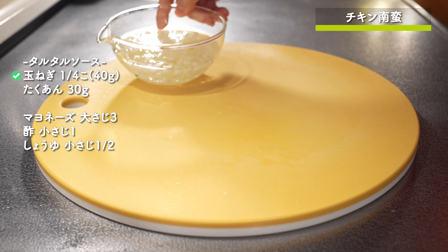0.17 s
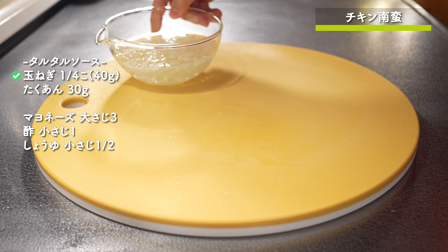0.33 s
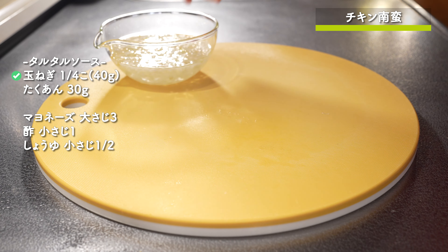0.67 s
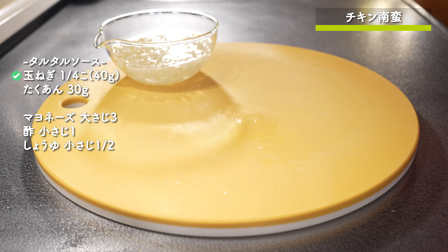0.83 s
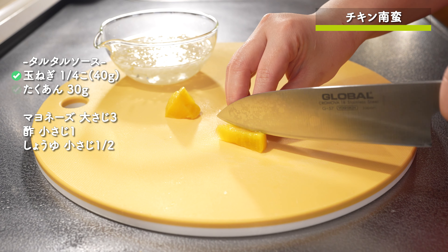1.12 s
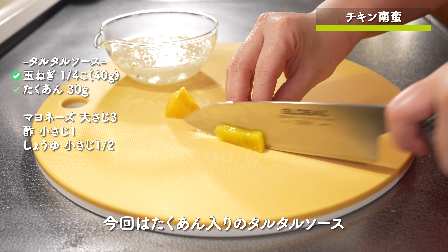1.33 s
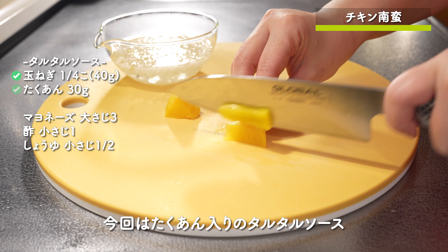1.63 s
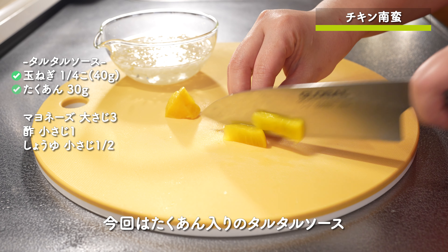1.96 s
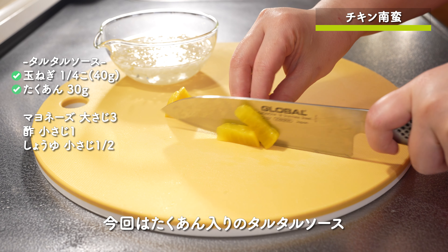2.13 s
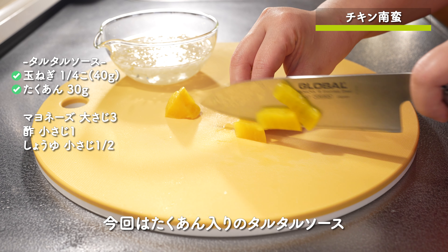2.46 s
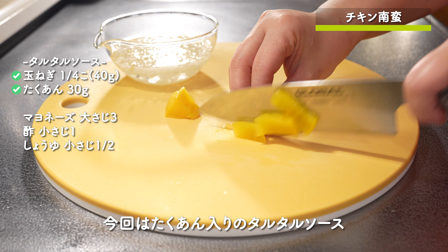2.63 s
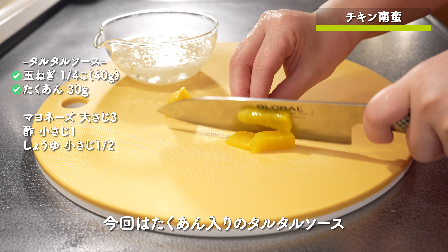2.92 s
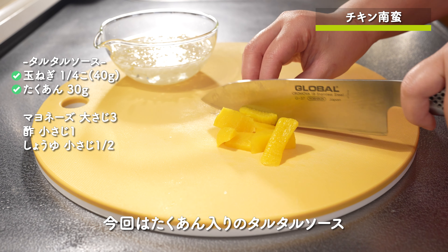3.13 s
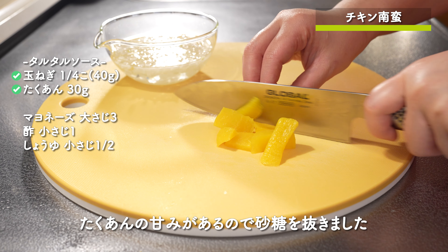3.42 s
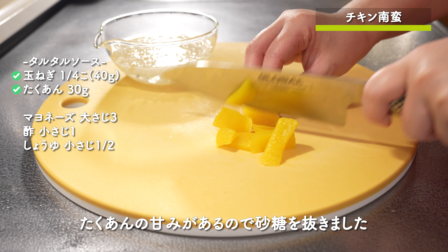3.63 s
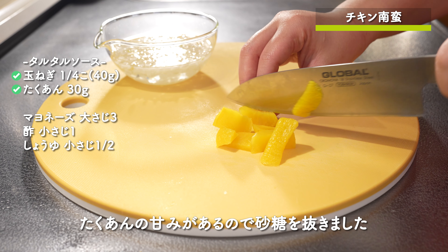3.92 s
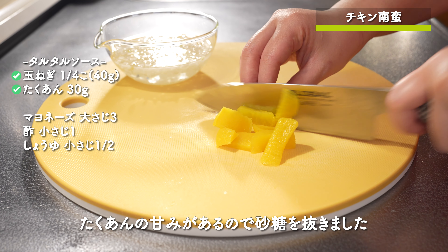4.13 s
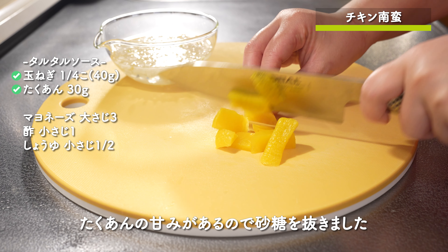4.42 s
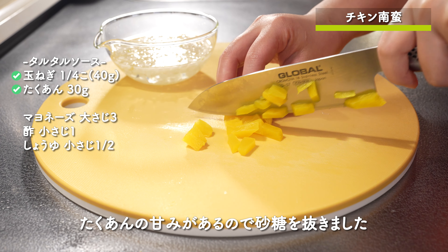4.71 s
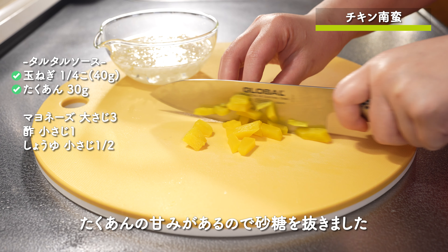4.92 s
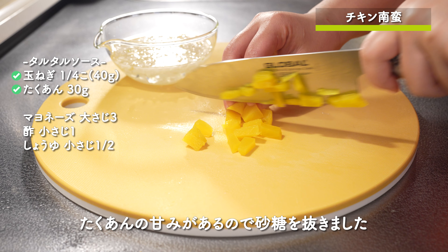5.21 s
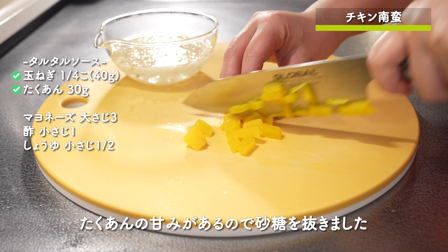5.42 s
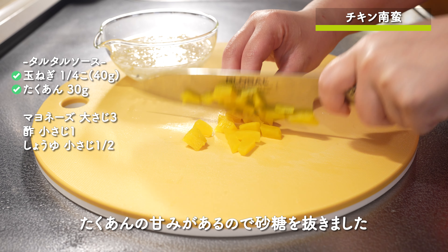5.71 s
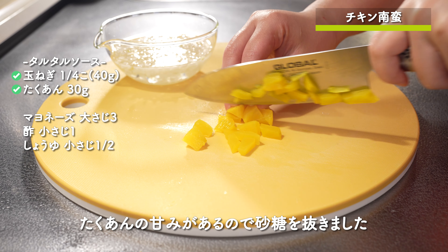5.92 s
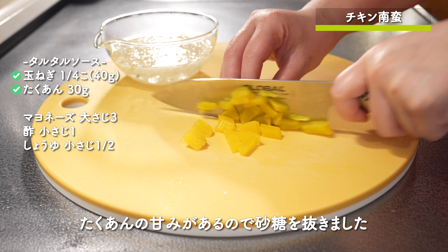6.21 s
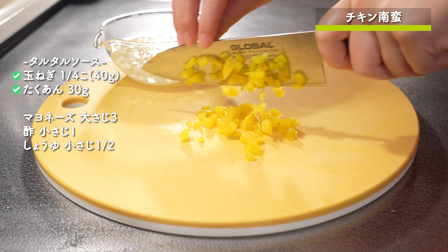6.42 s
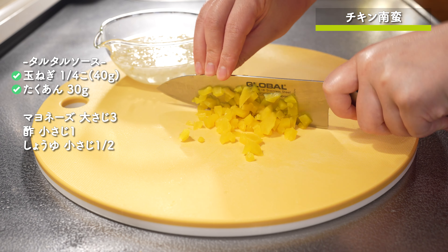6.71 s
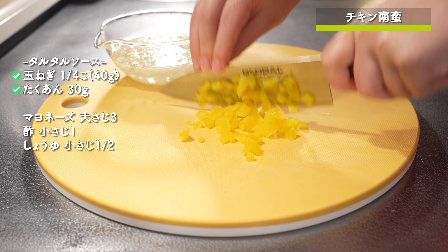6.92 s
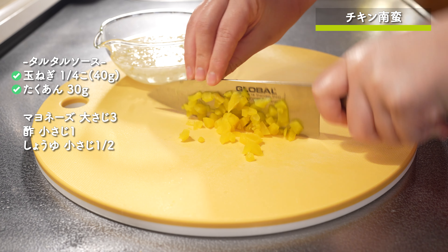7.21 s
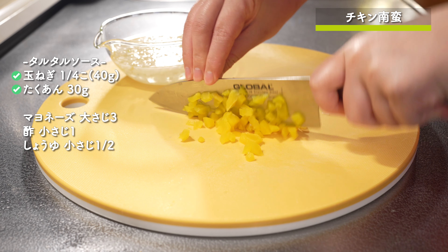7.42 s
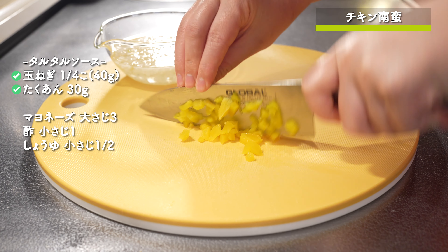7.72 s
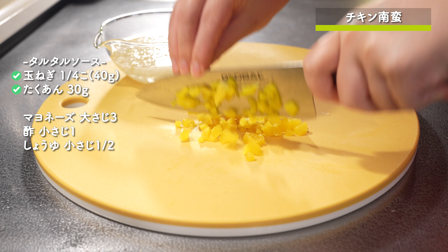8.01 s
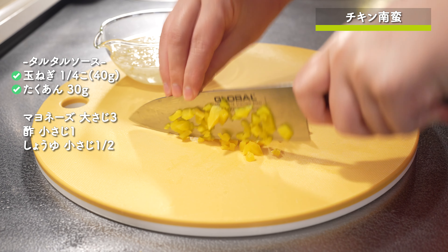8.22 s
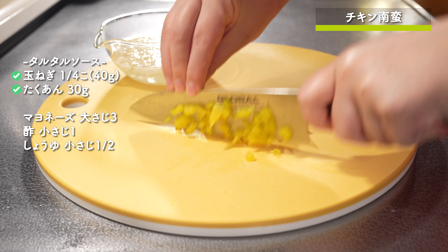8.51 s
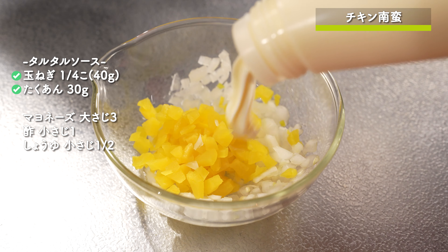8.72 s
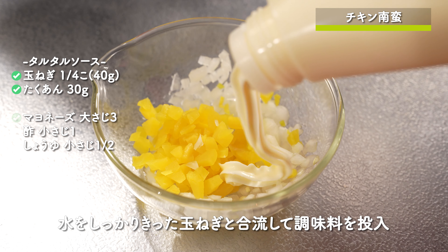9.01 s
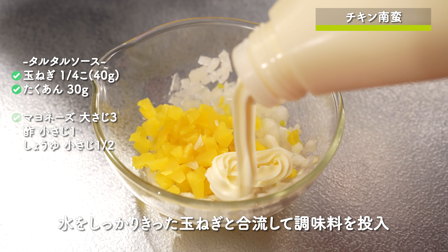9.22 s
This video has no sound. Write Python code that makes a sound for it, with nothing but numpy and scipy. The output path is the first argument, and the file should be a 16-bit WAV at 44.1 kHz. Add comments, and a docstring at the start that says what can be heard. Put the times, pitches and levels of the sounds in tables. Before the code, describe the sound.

A glass bowl is set down and slides wetly, then a steel knife crunches through pickled radish on a plastic board in a quiet kitchen.

```python
"""In a quiet humming kitchen a glass bowl is set down and wet glass slides over the counter, hissing as smooth noise.
Then a steel knife slices and chops crisp pickles on a plastic board lying on a steel counter, near one microphone.
Bursting noise makes the crunch; short pushes ring the modes of board and counter; resonances make the blade sing.
After the last cut come a few small clicks and a dry tap. Behind it filtered noise hums, a whine comes and goes,
and fuzzy bands swell after some knocks, like their tails."""
import sys
import numpy as np
from scipy import signal
from scipy.fft import rfft, irfft, next_fast_len
from scipy.io import wavfile
from scipy.ndimage import uniform_filter1d, map_coordinates

SR = 44100
rng = np.random.default_rng(int(sys.argv[2]) if len(sys.argv) > 2 else 0)


def generate_wav(signal):
    """Clip the signal to [-1, 1] and save it as 16-bit WAV at the path in sys.argv[1]."""
    frames = np.transpose(np.atleast_2d(signal))
    scaled = np.clip(frames, -1, 1) * 32767
    pcm = np.round(scaled).astype(np.int16)
    wavfile.write(sys.argv[1], SR, pcm)


N = 412776

# Knocks: (time [s], peak level ahead of the crack [dB], time for the push to peak [ms],
#          thud [dB], boom [dB], extra for boom modes below 140 Hz [dB])
BLOWS = [(0.1815, -13, 0.35, 4.5, 4.5, -6.5), (0.5015, -23.5, 0.78, -3, 2, -1.5),
         (1.3064, -15.5, 0.51, -16, 4, -12), (1.4209, -28.5, 1.34, 0, 4.5, 5.5),
         (1.9909, -10.5, 0.25, -10, 1, 3), (2.655, -11, 0.18, -8.5, 4.5, -3), (3.154, -44, 0.59, 5, -12, 0),
         (3.171, -49, 0.51, -8, 19, -12), (3.2568, -29.5, 1.3, -4, 15, -10),
         (3.4128, -27, 1.44, 6.5, 12, 0), (4.0215, -35, 0.5, 12, 9, -3), (4.0949, -15, 0.59, -26, 2.5, -20),
         (4.1737, -30, 2.5, 10.5, -5, 14), (4.7892, -36, 0.83, 7.5, -4, 14), (4.862, -28, 0.9, 4, -7, 0),
         (4.8678, -23, 0.81, -1, 5.5, 4.5), (5.441, -20.5, 0.72, 9.5, -5, -1),
         (5.463, -11.5, 0.2, -1.5, -6, -3), (5.5523, -24.5, 0.9, 4, 2, 9.5),
         (5.621, -33.5, 1.2, 16.5, 19, -3.5), (6.151, -21.5, 0.2, -6, -12, 3.5),
         (6.1685, -11.5, 0.17, -5, 5, -7), (6.2603, -36.5, 1.4, 10.5, 4, 13.5),
         (6.591, -35, 0.69, 27, -7, 5.5), (6.615, -33, 0.13, -5, 6, -11),
         (6.6419, -28.5, 1.44, -16, 2.5, -10), (7.1346, -14.5, 0.18, 0, 1, -2.5),
         (7.227, -21, 3.2, 21, 3.5, 10.5), (7.6575, -11.5, 0.11, -3, 3.5, -2),
         (7.7657, -22.5, 1.2, 9, 3, 6), (8.2041, -11.5, 0.16, -12.5, 4, -3),
         (8.3032, -17.5, 1.34, 9, 1.5, 6)]
# Tones of the steel blade: (frequency [Hz], width [Hz], level [dB])
BLADE_TONES = [(2600, 70, -3), (3030, 100, -3), (3590, 130, -3), (3950, 90, -2), (5280, 80, -3),
               (6100, 150, -3), (7050, 170, -2), (8350, 130, -2), (9900, 150, -8), (11530, 90, -1),
               (13500, 200, -6)]
# Spectrum of the flesh crunching: (frequency [Hz], level per Hz [dB])
CRUNCH_SPECTRUM = [(1060, -37), (1800, -10.5), (2050, 2), (2270, -4.5), (2720, -0.5), (3600, 6.5),
                   (5400, -6.5), (7500, -15), (9750, -46), (16500, -120)]
# Spectrum of the fine fizz on top: (frequency [Hz], level per Hz [dB])
FIZZ_SPECTRUM = [(3240, -48.5), (5500, 0), (7550, 2.5), (8220, 5.5), (15100, 2.5), (16200, -8.5)]
# Spectrum of friction heard through the board: (frequency [Hz], level per Hz [dB])
BODY_SPECTRUM = [(88, -35), (150, 15), (389, 4.5), (522, 5), (919, 6), (1520, 5), (2250, -9.5), (2500, -7),
                 (3250, -27), (5500, -120)]


def amp(db):
    """dB to gain."""
    return 10 ** (np.asarray(db) / 20)


def unit(x):
    """Scaled to rms 1."""
    return x / np.sqrt(np.mean(x ** 2) + 1e-20)


def along(points, hz):
    """(Hz, value) points on a log axis."""
    f, v = np.transpose(points)
    return np.interp(np.log(hz + 1), np.log(f + 1), v)


def filtered(x, response):
    """x times a complex response of frequency."""
    m = next_fast_len(len(x) + 8192)
    return irfft(rfft(x, m) * response(np.fft.rfftfreq(m, 1 / SR)), m)[:len(x)]


def coloured(x, spectrum):
    """x with the given spectrum, rms 1."""
    return unit(filtered(x, lambda hz: amp(along(spectrum, hz))))


def resonant(peaks, sign=-1):
    """Causal response of a set of resonances; neighbours in opposite phase unless sign is 1."""
    return lambda f: sum(sign ** k * amp(db) * 1j * f * w / (c * c - f * f + 1j * f * w)
                         for k, (c, w, db) in enumerate(peaks))


def wobble(rate):
    """A smooth random curve through normally distributed knots, rate of them a second."""
    knots = rng.standard_normal(int(N * rate / SR) + 4)
    return map_coordinates(knots, [np.arange(N) * rate / SR])


def gain_curve(rows):
    """Gain per sample of a (time [s], level [dB]) curve."""
    return amp(np.interp(np.arange(N) / SR, *np.transpose(rows)))


def ramps(rows, rise, fall):
    """Gains per sample: a row rises, ramps between two levels and falls [dB/s]; later columns add gains."""
    out = np.zeros((len(rows[0]) - 3, N))
    t = np.arange(N) / SR
    for start, end, first, last, *rest in rows:
        near = slice(max(0, round((start - .2) * SR)), round((end + .3) * SR))
        now = t[near]
        db = np.interp(now, [start, end], [first, last])
        db = db - rise * np.maximum(start - now, 0) - fall * np.maximum(now - end, 0)
        gains = amp(db + np.array([0, *rest])[:, None])
        out[:, near] = np.hypot(out[:, near], gains)  # overlapping rows add as power
    return out


def background_hum():
    """Broad noise, strongest in the bass, whose level wavers a little."""
    # Hum of the quiet kitchen: (frequency [Hz], level per Hz [dB])
    hum_spectrum = [(15, -13.5), (40, 0), (60, 4.5), (130, -0.5), (230, -4.5), (350, -9.5), (600, -17),
                    (1000, -16), (1500, -21.5), (2400, -24.5), (3700, -19), (5200, -28.5), (8000, -33.5),
                    (13000, -35), (16200, -36.5)]
    level_db = -67 + 2.36 * wobble(2.962)
    return amp(level_db) * coloured(rng.standard_normal(N), hum_spectrum)


def background_drone():
    """Noise through three resonances: fuzzy bands whose level swells after some knocks, like their tails."""
    # Bands of the drone: (frequency [Hz], width [Hz], level [dB])
    drone_bands = [(431, 41, 4), (718, 368, 2.5), (838, 250, -1.5)]
    # Level of the drone and of tails after knocks: (time [s], level [dB])
    drone_levels = [(0.0, -79), (0.44, -65), (1.07, -72.5), (1.9, -70), (3.93, -73), (4.12, -65.5),
                    (6.07, -78.5), (6.23, -59), (6.33, -69.5), (7.69, -85.5), (7.77, -70.5), (9.36, -79.5)]
    drone = unit(filtered(rng.standard_normal(N), resonant(drone_bands)))
    return gain_curve(drone_levels) * drone


def background_hiss():
    """Very faint noise with the fizz spectrum and a slowly wavering level."""
    level_db = -99.5 + 1.5 * wobble(1.5)
    return amp(level_db) * coloured(rng.standard_normal(N), FIZZ_SPECTRUM)


def background_whine():
    """Noise passed twice through one resonance makes a fuzzy whine that comes and goes, trembling."""
    # Band of the whine, for each pass: (frequency [Hz], width [Hz], level [dB])
    whine_band = [(1472, 140, 0)]
    # Level of the whine before its tremble: (time [s], level [dB])
    whine_levels = [(0.0, -93), (0.21, -90), (0.34, -85), (1.69, -83), (2.01, -69.5), (3.2, -82.5),
                    (3.39, -69.5), (3.83, -76), (4.28, -61), (4.46, -70), (5.42, -77), (5.81, -93),
                    (6.31, -76.5), (7.27, -75.5), (7.43, -93.5), (8.37, -78.5), (8.73, -84.5), (9.36, -85)]
    whine = unit(filtered(rng.standard_normal(N), lambda hz: resonant(whine_band)(hz) ** 2))
    return gain_curve(whine_levels) * amp(2.2 * wobble(14)) * whine


def room(x):
    """The kitchen answers 2.9 ms later with a noise tail in which each frequency dies at its own speed."""
    # Reverberation of the kitchen: (frequency [Hz], time to fall 60 dB [s])
    kitchen_decay = [(100, 0.64), (400, 0.45), (1000, 0.24), (4000, 0.2), (12000, 0.14)]
    hz, t, noise = signal.stft(rng.standard_normal(SR // 2), SR, nperseg=256)
    fade = amp(-60 * t / along(kitchen_decay, hz)[:, None])
    tail = signal.istft(noise * fade, SR, nperseg=256)[1]
    return signal.fftconvolve(np.pad(x, (130, 0)), tail / np.linalg.norm(tail))


def patchy(x, depth_db):
    """Narrow bands swell and fade at random, as the wet contact shifts."""
    bands = signal.stft(x, nperseg=256)[2]
    field = uniform_filter1d(rng.standard_normal(bands.shape), size=3, axis=0)
    field = uniform_filter1d(field, size=9, axis=1)
    return signal.istft(bands * amp(depth_db * unit(field)), nperseg=256)[1][:N]


def rubbing(pressure, grain):
    """One grain of friction heard as crunch, as fizz and through the board."""
    crunch, fizz, body = pressure
    return (crunch * coloured(grain, CRUNCH_SPECTRUM) + fizz * coloured(grain, FIZZ_SPECTRUM)
            + body * coloured(grain, BODY_SPECTRUM))


def bursting(rate, spread_db):
    """Cells burst at random moments, each a short puff of uneven strength, over a bed of noise."""
    pops = (rng.random(N) < rate / SR) * amp(spread_db * rng.standard_normal(N))
    puff = amp(-60 * np.arange(400) / SR / 0.0094)  # falls at 60 dB in 9.4 ms
    puffs = np.convolve(pops, puff)[:N]
    return rng.standard_normal(N) * (unit(puffs) + 2.14) * amp(1.5 * wobble(90))


def glass_wipes():
    """Wet glass slides over the counter: smooth noise without bursts, with shifting bands."""
    # Slides of the glass: (start [s], end [s], first level [dB], last level [dB],
    #                       added for fizz [dB], added for body [dB])
    wipe_rows = [(0.225, 0.3, -56.5, -60.5, -15, -5), (0.31, 0.42, -60.5, -53.5, -13, -8),
                 (0.43, 0.5, -54, -58, -15.5, -4), (0.64, 0.75, -67, -58, -13.5, -6.5),
                 (0.78, 0.86, -61, -56.5, -16.5, 2), (0.87, 1.0, -54, -68.5, -14.5, -4)]
    glass = patchy(rng.standard_normal(N), depth_db=2.0)
    return rubbing(ramps(wipe_rows, rise=450, fall=310), glass)


def ticks():
    """A small click or touch: a crack of a few ms, with ringing tones, each at a new strength."""
    # Small ticks: (time [s], level, 9 dB above the peak heard [dB],
    #               dullness, held within -6 and 12 [dB per octave])
    tick_rows = [(0.179, -23.5, 23), (0.5067, -44, 8), (1.1597, -47, 5), (1.1947, -49, 0),
                 (1.4004, -50, -2.5), (1.4595, -38.5, 11), (1.54, -45, -3), (1.707, -32.5, 6.5),
                 (2.3626, -31, 4.5), (2.61, -31, -1), (2.837, -36.5, 22), (3.223, -48.5, 3),
                 (3.6102, -41, 12), (3.7564, -51, 8), (3.98, -49.5, 1.5), (4.0282, -30.5, -7),
                 (4.2956, -40, 7), (4.3365, -33.5, 10), (4.501, -34, 7), (4.8941, -45, -2.5),
                 (5.25, -41, 17), (5.369, -40, 11), (5.891, -31, 10), (6.0443, -37.5, 7), (6.5885, -35, 0),
                 (6.6743, -32, -7), (6.8087, -52, 3), (6.8224, -52, -5), (7.1274, -28, 8),
                 (7.1576, -45, -5), (7.3927, -54, -4), (7.648, -40, 0.5), (7.6558, -31, 6),
                 (7.6774, -41, -3), (7.711, -36, -5), (7.731, -25, 5), (8.2428, -26, -1), (8.8094, -35, -4),
                 (8.9402, -46, 9), (9.2756, -25, -7), (9.312, -44, -2)]
    ring_db = 12  # how strongly the tones ring
    out, t = np.zeros(N + SR), np.arange(2048) / SR
    for s, db, dull_db in tick_rows:
        crack = amp(-60 * t / 0.003) * rng.standard_normal(len(t))
        tones = [(hz, width, level + rng.normal(0, 4.5)) for hz, width, level in BLADE_TONES]

        def colour(hz):
            tilt = amp(-np.clip(dull_db, -6, 12) * np.log2((hz + 500) / 5000))
            low_cut = hz ** 2 / (hz ** 2 + 1600 ** 2)
            return tilt * low_cut / (1 + (hz / 13500) ** 8)

        crack = filtered(crack, lambda hz: colour(hz) * (1 + amp(ring_db) * resonant(tones)(hz)))
        out[round(s * SR):][:len(t)] += amp(db - 9) * crack / np.abs(crack).max()
    return out[:N]


def slides():
    """Friction feeds the blade's own tones, each flickering on its own, over a plain hiss."""
    # Blade singing as it slides, friction ahead of the filters: (start [s], end [s],
    #                                                             first level [dB], last level [dB])
    slide_rows = [(1.712, 1.86, -63.5, -88), (2.44, 2.51, -75.5, -70), (3.76, 3.81, -63, -66),
                  (3.82, 3.95, -74, -79), (4.506, 4.55, -62, -76), (4.59, 4.635, -67.5, -70),
                  (5.895, 5.95, -74, -88)]
    rub = ramps(slide_rows, rise=1400, fall=650)[0] * bursting(rate=700, spread_db=3)
    hiss = amp(-27) * coloured(rub, FIZZ_SPECTRUM) + amp(-21.5) * coloured(rub, CRUNCH_SPECTRUM)
    out = hiss * np.std(rub)
    for tone in BLADE_TONES:
        flicker = amp(-2 + 5 * wobble(40))
        out = out + flicker * filtered(rub, resonant([tone]))
    return amp(0.5) * out


def rattle():
    """After each knock the board chatters on its mat for a moment: noise that starts 4 ms late and dies fast."""
    level_db, t60_s = -15.5, 0.046  # level against the knock's
    blows = np.zeros(N)
    for s, db, *_ in BLOWS:
        blows[round((s + .004) * SR)] = amp(db + level_db)
    decay = amp(-60 * np.arange(SR // 4) / SR / t60_s)
    fade = signal.fftconvolve(blows, decay)[:N]
    return fade * coloured(rng.standard_normal(N), BODY_SPECTRUM)


def ringing(modes, t, longer, rise):
    """Decaying modes at new strengths and slightly new pitch, each beating; long-lived ones build up slowly."""
    beat_depth, beat_share = .6, .12  # the beat's top rate is this share of the pitch
    total = 0
    for hz, db, t60 in modes:
        fade = amp(db + rng.normal(0, 2.67) - 60 * t / (t60 * longer))
        tone = np.sin(2 * np.pi * hz * rng.normal(1, 0.021) * t)
        beat_turns = beat_share * hz * rng.random() * t + rng.random()
        beating = 1 + beat_depth * np.sin(2 * np.pi * beat_turns)
        build_up = 1 - np.exp(-t / (rise * t60 ** 2))
        total = total + fade * tone * beating * build_up
    return total


def knocks():
    """A short push rings the board at once and the counter slowly; a long contact sounds dull."""
    # Resonances of the plastic board: (frequency [Hz], width [Hz], level [dB])
    board_modes = [(240, 150, -7.5), (494, 220, -1.5), (840, 690, -2), (1036, 192, 3.5), (1520, 100, -34),
                   (2880, 140, -2), (3860, 170, -6)]
    # Modes of the steel counter: (frequency [Hz], level [dB], 60 dB decay before scaling [s])
    counter_modes = [(49.66, -22.5, 0.93), (82.9, -26.5, 0.58), (119, -13.5, 0.39), (133.9, -12, 0.34),
                     (173.8, -7.5, 0.34), (194.9, -3, 0.28), (233.2, -7.5, 0.18), (294.4, -10, 0.18),
                     (390.4, -12.5, 0.42), (457.8, -4.5, 0.19), (538.8, -8.5, 0.4), (628, -4, 0.2),
                     (910, -13.5, .13), (1118, -29, 0.1)]
    # Board rocking on its mat: (frequency [Hz], level [dB], 60 dB decay before scaling [s])
    thud_modes = [(152.8, 0, 0.1), (212.4, 0.5, 0.12)]
    # One dry tap elsewhere: columns as in BLOWS
    tap_row = (8.9396, -32, 1.9, -30, 6.5, -8)
    ring_length, tap_ring_length = 0.7, 0.24  # scales the boom's decay and the room's level
    ring_loss_per_ms = .12  # a long contact damps the ringing
    crack_db, crack_loss_db_per_ms = -17.5, 9  # a longer contact cracks less

    size = SR * 5 // 8
    out, t = np.zeros(N + SR), np.arange(size) / SR
    impulse = np.eye(1, size)[0]
    board = filtered(impulse, resonant(board_modes, sign=1))
    board = board + amp(-3) * np.roll(board, round(0.00354 * SR))  # the board slaps the counter a moment later
    board = board / np.abs(board).max()

    rows = [(*row, ring_length) for row in BLOWS] + [(*tap_row, tap_ring_length)]
    for s, db, ms, thud_db, boom_db, deep_db, longer in rows:
        width = max(ms, .05) / 1000
        push = (t / width * np.exp(-t / width))[:1024]
        damped = 1 / (1 + ring_loss_per_ms * ms)

        modes = [(hz, level + deep_db * (hz < 140), t60) for hz, level, t60 in counter_modes]
        boom = ringing(modes, t, longer * damped, rise=0.061)
        thud = ringing(thud_modes, t, 0.86 * damped, rise=0.42)
        knock = amp(thud_db - 23.5) * thud - board
        knock = filtered(knock, lambda hz: (1j * hz / (1j * hz + 55)) ** 3)  # too small to push deep bass
        hit = signal.fftconvolve(knock + amp(boom_db - 30.0) * boom, push / push.sum())[:size]
        hit = hit / np.abs(hit).max()

        crack_fade = amp(crack_db - crack_loss_db_per_ms * ms - 60 * t[:1024] / 0.011)
        hit[:1024] += crack_fade * uniform_filter1d(rng.standard_normal(1024), size=5)
        wet = longer * amp(-9.0) * room(hit[:SR // 4])
        start = round(s * SR)
        out[start:][:size] += amp(db) * hit
        out[start:][:len(wet)] += amp(db) * wet
    return out[:N]


def knife_strokes():
    """Cells burst as the edge presses and drags, and the blade rings along; two late clicks share the grain."""
    # Edge pressing through the flesh, and one faint rub that stops sharply: (start [s], end [s],
    #     first level [dB], last level [dB], added for fizz [dB], added for body [dB])
    cut_rows = [(1.195, 1.305, -65.5, -38.5, -8, 4), (1.915, 1.99, -59.5, -40, -8, 2.5),
                (2.467, 2.53, -69, -69, -16, 3), (2.605, 2.654, -56, -40, -6.5, 5),
                (3.225, 3.266, -69, -43, -12, 2), (4.028, 4.094, -51, -36, -8.5, -0.5),
                (4.734, 4.862, -51, -47.5, -14, -0.5), (5.379, 5.39, -59.5, -53, 2, -2.5),
                (5.4, 5.462, -60.5, -41.5, -8, 2), (6.085, 6.166, -64, -37, -10, 2),
                (6.58, 6.594, -68, -45, -13, 7.5), (6.61, 6.64, -53, -36, -8.5, 1.5),
                (6.672, 6.7, -39, -39, -16.5, -1.5), (7.125, 7.134, -60, -40, -12, 10.5),
                (7.145, 7.225, -48, -40, -13, 3), (7.647, 7.656, -67.5, -47, -16.5, 12),
                (7.68, 7.75, -51.5, -42.5, -11.5, 7), (7.916, 7.923, -62, -60, -16, 5),
                (8.192, 8.204, -48.5, -37.5, -20, 6.5), (8.218, 8.294, -55, -38, -16, 7.5)]
    # Blade dragging over board and slices, mostly easing off: (start [s], end [s],
    #     first level [dB], last level [dB], added for fizz [dB], added for body [dB])
    drag_rows = [(1.32, 1.41, -55, -60, -9.5, 2), (1.77, 1.85, -67.5, -72, -11, 6.5),
                 (2.005, 2.1, -55, -65, -9, 7.5), (2.67, 2.745, -56.5, -59, -11, 5.5),
                 (3.28, 3.42, -55.5, -53, -10.5, -0.5), (4.105, 4.23, -49.5, -59.5, -9.5, 1.5),
                 (4.25, 4.32, -67, -70, -15, 8), (4.9, 4.96, -57.5, -60, -14, 2),
                 (5.48, 5.54, -49.5, -53, -11.5, 3.5), (5.58, 5.63, -66, -71, -10, 3),
                 (6.048, 6.08, -65, -68, -8, 4), (6.18, 6.31, -57.5, -65.5, -11, 6),
                 (6.5, 6.56, -74, -72, -15, -6), (6.71, 6.74, -58, -68, -14, 2),
                 (6.76, 6.87, -68.5, -63.5, -18, -2.5), (7.29, 7.41, -78.5, -73.5, -10, 7),
                 (7.66, 7.78, -54, -66.5, -23, 11.5), (8.37, 8.47, -71, -69.5, -16, 2)]
    # Short fizz of two late clicks: (start [s], end [s], first level [dB], last level [dB],
    #     added for fizz [dB], added for body [dB])
    spit_rows = [(8.809, 8.81, -67, -65.5, 5.3, 2.2), (9.276, 9.277, -58.5, -58, 2.3, 5)]
    cells = patchy(bursting(rate=510, spread_db=3), depth_db=2.5)
    cells = cells + amp(-15.5) * filtered(cells, resonant(BLADE_TONES))
    sharp_ended = ramps(cut_rows + spit_rows, rise=7000, fall=1280)
    dragging = ramps(drag_rows, rise=1900, fall=280)
    return rubbing(np.hypot(sharp_ended, dragging), cells)


def scene():
    """Background, close sounds and their answer from the kitchen all reach one microphone."""
    background = background_hum() + background_drone() + background_hiss() + background_whine()
    close = glass_wipes() + ticks() + slides() + rattle() + knife_strokes()
    reflected = amp(-11) * room(close)[:N]
    return (background + close + reflected + knocks())[None]  # knocks bring their own room


def record(dry):
    """The microphone drops the deepest bass; nothing is kept above the band limit."""
    top_hz = 15950
    bass_cut = filtered(dry[0], lambda hz: (1j * hz / (1j * hz + 22)) ** 2)
    return filtered(bass_cut, lambda hz: np.clip((top_hz - hz) / 200, 0, 1))[None]


dry = scene()
out = record(dry)
generate_wav(out)
```